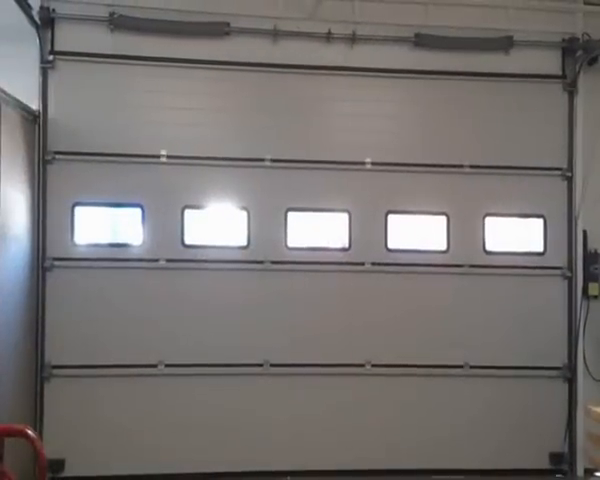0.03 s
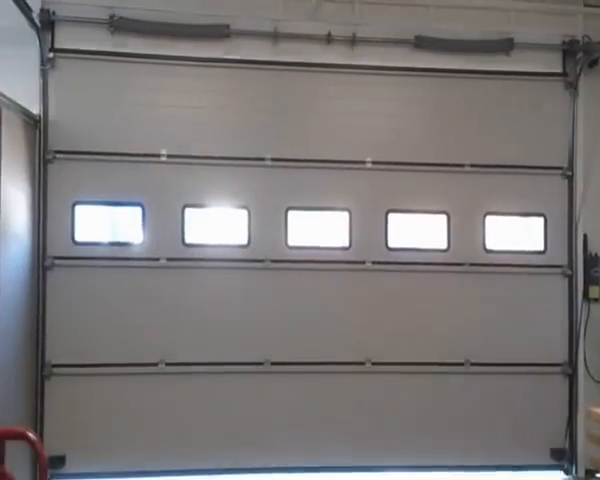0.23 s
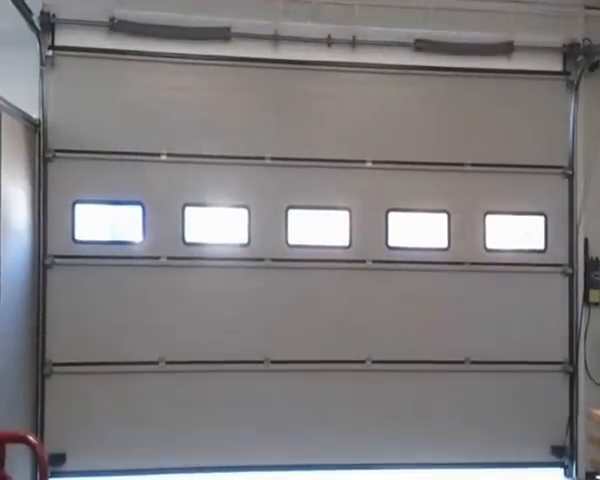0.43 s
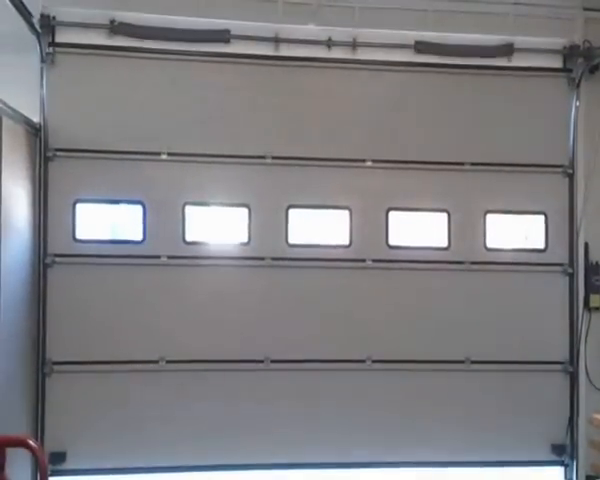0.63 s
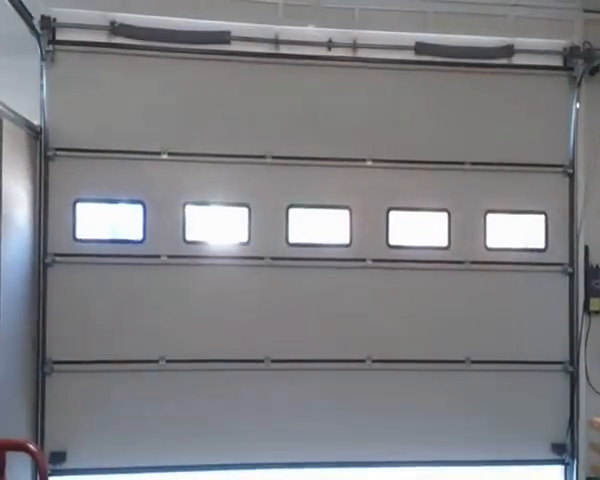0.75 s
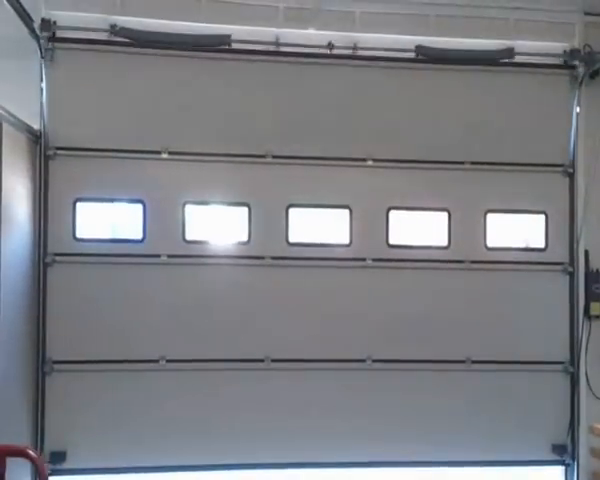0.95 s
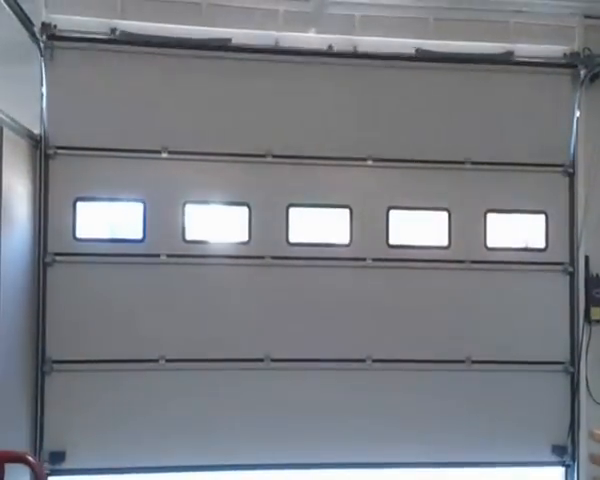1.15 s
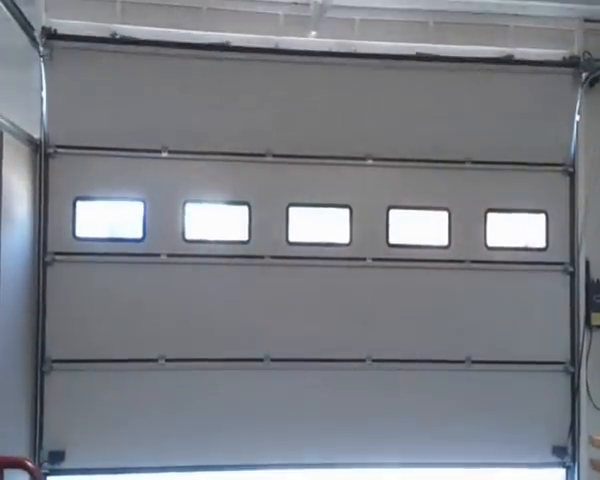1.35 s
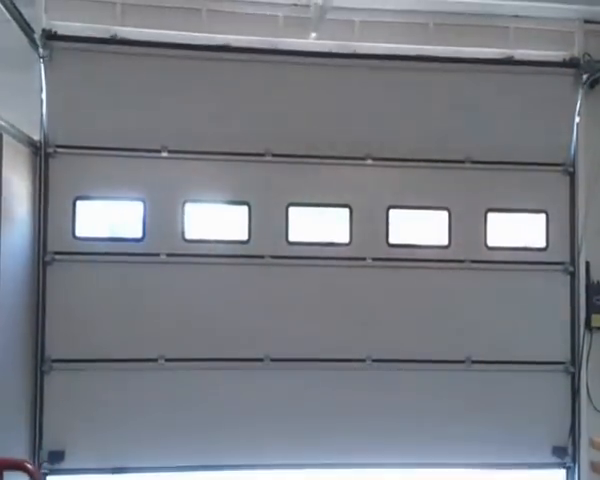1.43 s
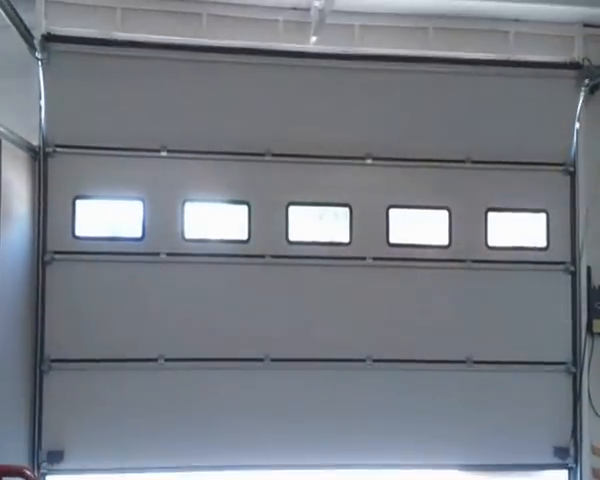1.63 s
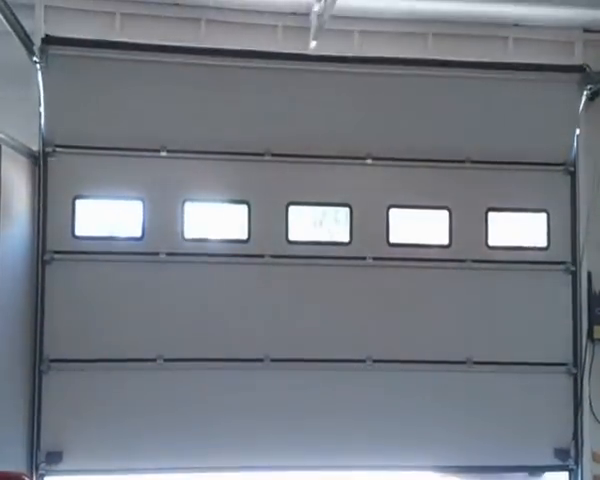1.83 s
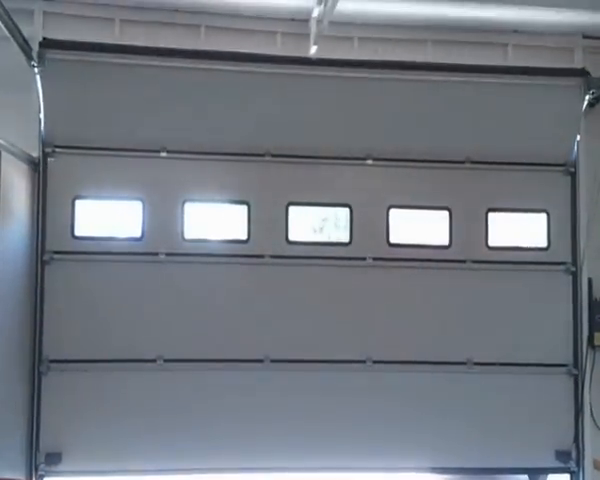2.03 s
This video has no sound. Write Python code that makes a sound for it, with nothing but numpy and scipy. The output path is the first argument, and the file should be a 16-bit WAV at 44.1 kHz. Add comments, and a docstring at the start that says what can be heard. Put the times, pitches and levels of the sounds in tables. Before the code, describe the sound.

A motor-driven sectional steel door rises, clanking and rattling in a large hall.

```python
"""Sectional steel door lifting in a large hall

An electric drive takes up the slack with a few clanks, then rattles and hums, easing off as the door
gets going. The panels rumble and boom; rollers chatter in their tracks as the top one enters the bend.
One microphone, well back from the door: more hall than direct sound, over a faint room tone."""
import sys
import numpy as np
from scipy import signal
from scipy.fft import rfft, irfft, next_fast_len
from scipy.io import wavfile
from scipy.ndimage import map_coordinates

SR = 44100
rng = np.random.default_rng(int(sys.argv[2]) if len(sys.argv) > 2 else 0)


def generate_wav(signal):
    """Clip the signal to [-1, 1] and save it as 16-bit WAV at the path in sys.argv[1]."""
    frames = np.transpose(np.atleast_2d(signal))
    scaled = np.clip(frames, -1, 1) * 32767
    pcm = np.round(scaled).astype(np.int16)
    wavfile.write(sys.argv[1], SR, pcm)


N = 92610

# blows on the door: t/s, drive clang/dB, hinge and track clash/dB, panel thud/dB
BLOWS = [(.193, -35, -41.5, -34.5), (.232, -27, -42, -40), (.262, -53, -39, -38.5),
         (0.336, -29, -39, -35.5), (.450, -32, -32.5, -47.5), (.483, -26.5, -25, -34.5),
         (0.627, -50, -40.5, -37.5), (1.650, -57, -54.5, -47.5)]
# ringing of hinges and track: f/Hz, relative level/dB
STEEL_MODES = [(4669, 5), (5291, -20), (5398, 6), (5887, -9), (6316, -38), (6452, 9), (7269, -5), (8880, 3),
               (10087, -12)]
# rollers in the track: t/s, length/s, level/dB, treble tilt/(dB per octave)
ROLLER_RUNS = [(.025, 0.078, -58, 5.5), (0.892, 0.012, -34.5, 4), (0.932, 0.12, -41, 5),
               (1.141, 0.018, -41.5, 11), (1.393, 0.1, -47, 6), (1.638, 0.067, -42.5, 1.5),
               (1.701, 0.095, -37, 3), (1.737, 0.095, -36.5, 2), (1.954, .1, -54, 6),
               (2.032, .06, -40.5, 3.5)]
# panels flexing: t/s, centre f/Hz, level/dB
PANEL_FLEXES = [(0.261, 209, -40.5), (0.343, 123, -41.5), (0.626, 80, -40.5), (.855, 129, -43.5),
                (0.937, 181, -48.5), (1.145, 145, -48), (1.22, 840, -52), (1.431, 102, -55),
                (1.535, 720, -53), (1.604, 210, -46.5), (1.65, 980, -51), (1.715, 620, -49.5)]
# a joint taking the load: f/Hz, level/dB
SQUEAK_TONES = [(4581, -57), (6520, -48.5)]
# strength of drive rattle, gear grinding and panel shake: t/s, level/dB
RATTLE_LEVELS = [(.19, -36), (.25, -31), (.40, -40.5), (.52, -29.5), (.68, -32.5), (.84, -33.5),
                 (1.03, -38), (1.15, -37.5), (1.28, -39), (1.35, -46.5), (1.49, -46), (1.55, -43),
                 (1.78, -45), (1.9, -52), (2.1, -42.5)]
GRIND_LEVELS = [(.2, -47), (.55, -36.5), (.8, -38.5), (1.02, -42), (1.14, -45.5), (1.28, -40), (1.4, -54.5),
                (1.68, -51.5), (2.1, -58)]
SHAKE_LEVELS = [(.19, -36), (.29, -33.5), (.42, -40), (.56, -33.5), (.72, -40.5), (.84, -44), (1.0, -41),
                (1.25, -45), (1.48, -51), (1.74, -45.5), (1.86, -53), (2.1, -50.5)]
# spectrum of each source at the microphone: f/Hz, relative level/dB
DRIVE_SPECTRUM = [(100, -13.5), (600, -20.5), (1000, -14.5), (1300, -6.5), (1550, 1), (1780, 3),
                  (2000, -6.5), (2350, -16), (2750, -9.5), (3150, -8.5), (3600, -14), (4100, -19.5),
                  (4500, -11), (5000, -18), (5850, -9), (6600, -21.5), (8000, -21), (10200, -24.5),
                  (12000, -36), (15500, -58)]
GRIND_SPECTRUM = [(400, -33), (950, -17), (1200, -2), (1480, 3), (1750, -8.5), (2100, -12.5), (2500, -30),
                  (6000, -59)]
STEEL_SPECTRUM = [(200, -28), (1000, -6), (2300, -4.5), (3200, -1.5), (4100, -1.5), (4700, -1.5),
                  (5200, 2.5), (6200, 3), (7200, 1), (8200, -5.5), (9400, -7), (10300, -1), (12000, -14.5),
                  (14500, -16), (15700, -23)]
TRACK_SPECTRUM = [(300, -29), (1000, -25), (2400, -3.5), (3200, 6.5), (3900, -3), (4800, 3.5), (6100, 1),
                  (7000, -1.5), (8100, -6), (10000, -5.5), (11500, -17), (15500, -28)]
PANEL_SPECTRUM = [(20, -58), (35, -17), (50, -2), (80, 3), (130, -1), (230, -2), (400, -7), (700, -7),
                  (1100, -10.5), (2200, -36.5), (6000, -52)]
ROOM_SPECTRUM = [(15, -53), (25, -6), (75, -0.5), (588, -3.5), (709, 2), (1030, -6.5), (1720, -3.5),
                 (2240, -18), (3440, -14.5), (3830, -19.5), (15000, -21.5)]
# reverberation of the hall: f/Hz, T60/s
HALL_DECAY = [(60, 0.83), (400, 1.25), (1600, 0.93), (4000, 1.45), (7000, 1.37), (10000, 0.92),
              (15000, 1.8)]

START_S, RUN_UP_S = 0.192, 0.046
RATTLE_PER_S, RATTLE_SCATTER, RATTLE_SPREAD_DB, CONTACT_S = 41, 0.25, 1.5, 0.0083
CLASH_S, CLANG_S, THUD_S = 0.0034, 0.013, 0.045  # build-up after a blow
RING_DB, RING_T60_S = -7, 0.8
BOOM_RELATIVE_WIDTH, BOOM_T60_S, BOOM_ATTACK_S = 0.46, 0.54, 0.0028
CHATTER_PER_S, CHATTER_SPREAD_DB = 700, 3
HUM_HZ, HUM_DB, HUM_WAVER_DB = 105.3, -57, 4
SQUEAK_S, SQUEAK_WIDTH_S, SQUEAK_RUB_DB = 0.1783, 0.0037, -41
DIRECT_DB, EARLY_S = -13.5, 0.019  # direct sound against the echoes; decay of the near-wall echoes
ROOM_TONE_DB, TOP_HZ = -57.5, 15700


def drive():
    """Uneven contacts rattle the housing, harder under load, over the grinding of the running gear."""
    jitter, strength = rng.standard_normal((200, 2)).T
    times = (np.arange(len(jitter)) + RATTLE_SCATTER * jitter) / RATTLE_PER_S
    knocks = np.bincount(np.abs(times * SR).astype(int), amp(RATTLE_SPREAD_DB * strength), N)[:N]
    decays = signal.lfilter([1], [1, -np.exp(-1 / (CONTACT_S * SR))], knocks)
    contacts = unit(decays * rng.standard_normal(N))
    rattle = moving_hall(contacts * running(RATTLE_LEVELS))
    grind = moving_hall(rng.standard_normal(N) * running(GRIND_LEVELS))
    return colour(rattle, DRIVE_SPECTRUM) + colour(grind, GRIND_SPECTRUM)


def clanks():
    """Each blow clangs the drive, clashes the fittings and thuds the panels; the hall carries it on."""
    t = clock()
    clang, clash, thud, ring = np.zeros((4, N))

    def blow(build_s):
        echoes = hall_response()
        return echoes / np.std(echoes[1:SR // 20]) * (1 - np.exp(-2 * t / build_s))
    for s, clang_db, clash_db, thud_db in BLOWS:
        clang += amp(clang_db) * delayed(blow(CLANG_S), s)
        clash += amp(clash_db) * delayed(blow(CLASH_S), s)
        thud += amp(thud_db) * delayed(blow(THUD_S), s)
        ring += amp(clash_db + RING_DB) * delayed(steel_ring(), s)
    metal = colour(clang, DRIVE_SPECTRUM) + colour(clash, STEEL_SPECTRUM) + ring
    return metal + colour(thud, PANEL_SPECTRUM)


def steel_ring():
    """Struck hinges and track ring in their modes, each at a new strength and slightly unsteady."""
    t = clock()
    modes = sum(amp(db + rng.normal(0, 1.5)) * np.sin(2 * np.pi * hz * t + 2.0 * wobble(38))
                for hz, db in STEEL_MODES)
    return unit(modes) * amp(-60 * t / RING_T60_S) * (1 - np.exp(-t / CLASH_S))


def panel_rumble():
    """The broad panels shudder as they travel."""
    shudder = unit(rng.standard_normal(N) * amp(1.55 * wobble(25.11)))
    return colour(moving_hall(shudder * running(SHAKE_LEVELS)), PANEL_SPECTRUM)


def panel_booms():
    """A flexing panel gives a short, hollow boom from a broad resonance."""
    out, t = np.zeros(N), clock()
    hz = np.fft.rfftfreq(N, 1 / SR)
    envelope = amp(-60 * t / BOOM_T60_S) * (1 - np.exp(-t / BOOM_ATTACK_S))
    for s, centre_hz, db in PANEL_FLEXES:
        band = np.exp(-0.5 * ((hz / centre_hz - 1) / (BOOM_RELATIVE_WIDTH / 2)) ** 2)
        boom = irfft(rfft(rng.standard_normal(N)) * band, N) * envelope
        out += amp(db) * delayed(boom / np.std(boom[:SR // 10]), s)
    return out


def rollers():
    """A roller scrapes the track in short, swelling runs of dense ticks."""
    out, t = np.zeros(N), clock()
    for s, length, db, tilt_db in ROLLER_RUNS:
        hits = rng.random(N) < CHATTER_PER_S / SR
        ticks = unit(hits * amp(CHATTER_SPREAD_DB * rng.standard_normal(N)) * rng.choice([-1, 1], N))
        progress = np.clip((t - s) / length, 0, 1)
        pressure = np.sqrt(np.abs(np.sin(np.pi * progress)))
        scrape = unit(ticks + 0.53 * rng.standard_normal(N)) * pressure
        tilted = [(hz, level + tilt_db * np.log2(hz)) for hz, level in TRACK_SPECTRUM]
        out += amp(db) * colour(hall(scrape), tilted)
    return out


def motor_hum():
    """The motor hums low, wavering in level and phase."""
    waver = amp(HUM_WAVER_DB * wobble(7.53))
    tone = np.sin(2 * np.pi * HUM_HZ * clock() + 0.74 * wobble(6.37))
    return running([(0, HUM_DB)]) * unit(waver * tone)


def joint_squeak():
    """A joint chirps and rubs as it takes the load, just before the door moves."""
    t = clock()
    tones = sum(amp(db) * np.sin(2 * np.pi * hz * t + 0.26 * wobble(205)) for hz, db in SQUEAK_TONES)
    press = np.exp(-0.5 * ((t - SQUEAK_S) / SQUEAK_WIDTH_S) ** 2)
    rub = amp(SQUEAK_RUB_DB) * colour(rng.standard_normal(N), STEEL_SPECTRUM)
    return press * tones + hall(press * rub)


def room_tone():
    """The faint, steady noise of the hall."""
    return amp(ROOM_TONE_DB) * colour(rng.standard_normal(N), ROOM_SPECTRUM)


def hall_response():
    """Door to microphone: direct path, near walls and a long tail; energy 1."""
    hz, t, noise = signal.stft(rng.standard_normal(N), SR, nperseg=256)
    decay = amp(-60 * t / along(HALL_DECAY, hz)[:, None])
    response = signal.istft(noise * decay, SR, nperseg=256)[1][:N]
    response *= 1 + np.exp(-clock() / EARLY_S)
    response /= np.linalg.norm(response)
    response[0] += amp(DIRECT_DB)
    return response / np.linalg.norm(response)


def hall(x):
    """x heard across the hall, by a new path each time."""
    return signal.fftconvolve(x, hall_response())[:N]


def moving_hall(x, count=4):
    """A moving source passes from one echo pattern to the next."""
    place = np.linspace(0, count - 1, N)
    return sum(hall(x * np.cos(np.pi / 2 * np.clip(place - k, -1, 1))) for k in range(count))


def running(levels):
    """Gain of a (t/s, level/dB) curve, faded in as the drive starts."""
    run_up = np.clip((clock() - START_S) / RUN_UP_S, 0, 1)
    return amp(np.interp(clock(), *np.transpose(levels))) * run_up


def colour(x, spectrum):
    """A causal filter that keeps the power of white noise."""
    size = 2 * next_fast_len(N)
    gain = unit(amp(along(spectrum, np.fft.rfftfreq(size, 1 / SR))))
    cepstrum = irfft(np.log(gain + 1e-6))
    cepstrum[1:size // 2] *= 2  # fold to minimum phase
    cepstrum[size // 2 + 1:] = 0
    return irfft(rfft(x, size) * np.exp(rfft(cepstrum)), size)[:N]


def along(points, hz):
    """(f/Hz, value) points interpolated on a log frequency axis."""
    point_hz, values = np.transpose(points)
    return np.interp(np.log(hz + 1), np.log(point_hz + 1), values)


def wobble(rate):
    """A smooth random curve, rate knots a second."""
    return map_coordinates(rng.standard_normal(256), [clock() * rate], mode="wrap")


def delayed(x, s):
    """x starting at s seconds."""
    return np.pad(x, (max(round(s * SR), 0), 0))[:N]


def amp(db):
    """Decibels to gain."""
    return 10 ** (np.asarray(db) / 20)


def unit(x):
    """Scaled to rms 1."""
    return x / np.sqrt(np.mean(x ** 2) + 1e-20)


def clock():
    """Seconds at each sample."""
    return np.arange(N) / SR


def scene():
    """Door and hall at one microphone, the same on both channels."""
    door = clanks() + drive() + panel_rumble() + panel_booms() + rollers() + motor_hum() + joint_squeak()
    return np.tile(door + room_tone(), (2, 1))


def record(dry):
    """The microphone passes nothing above TOP_HZ."""
    size = next_fast_len(N + SR // 2)
    passband = np.fft.rfftfreq(size, 1 / SR) < TOP_HZ
    return irfft(rfft(dry, size) * passband, size)[:, :N]


dry = scene()
out = record(dry)
generate_wav(out)
```